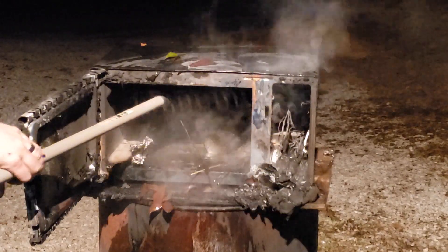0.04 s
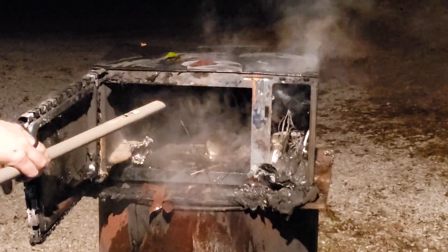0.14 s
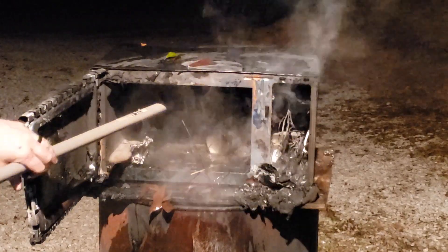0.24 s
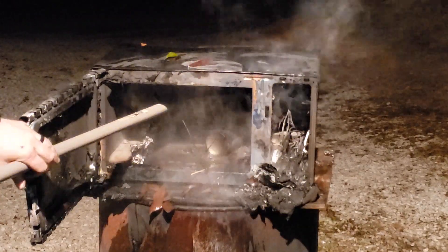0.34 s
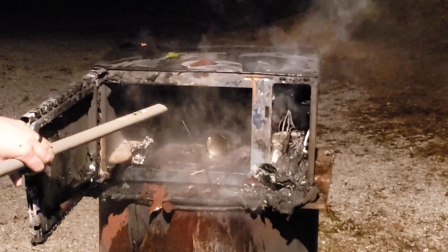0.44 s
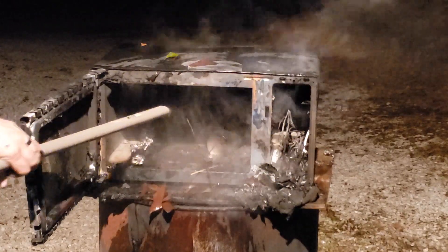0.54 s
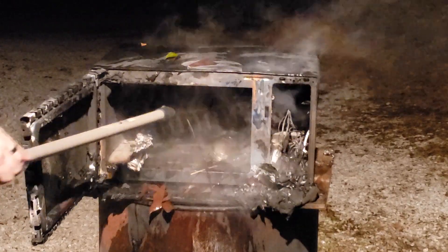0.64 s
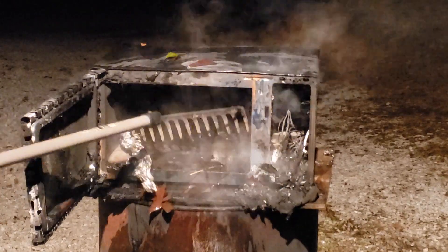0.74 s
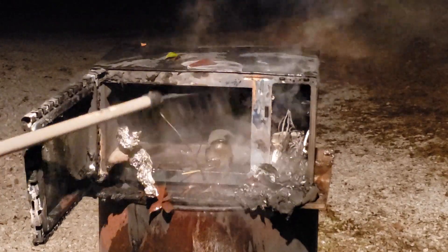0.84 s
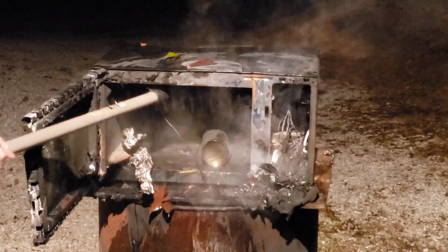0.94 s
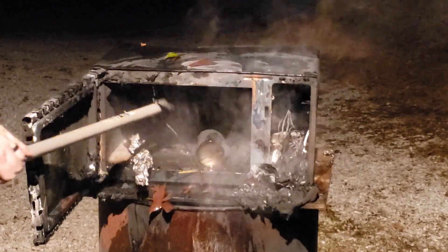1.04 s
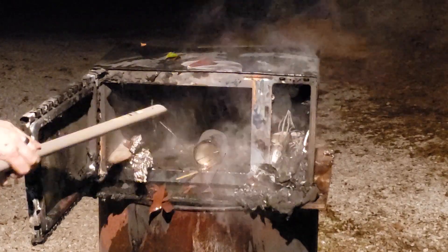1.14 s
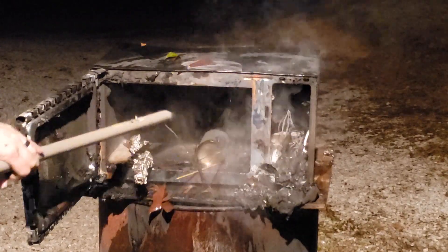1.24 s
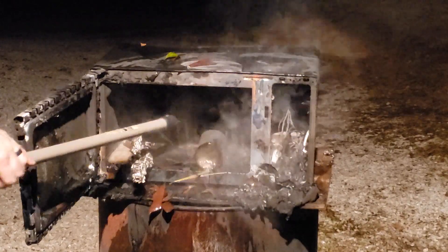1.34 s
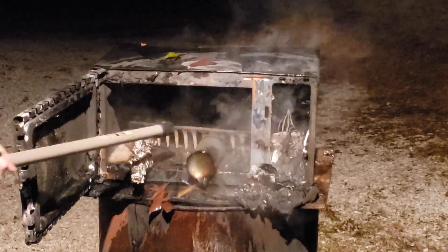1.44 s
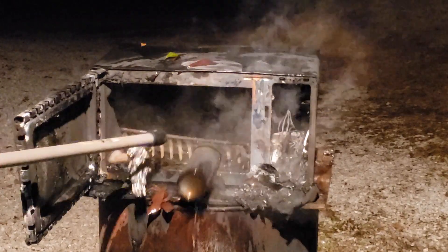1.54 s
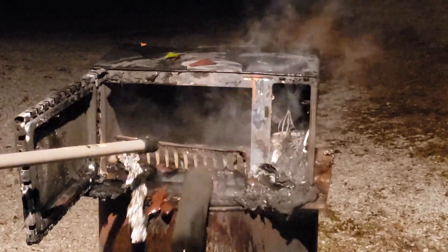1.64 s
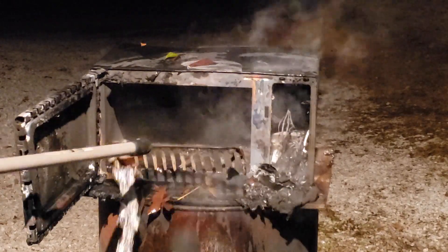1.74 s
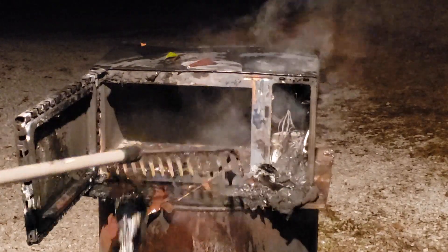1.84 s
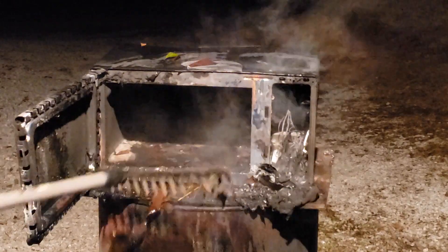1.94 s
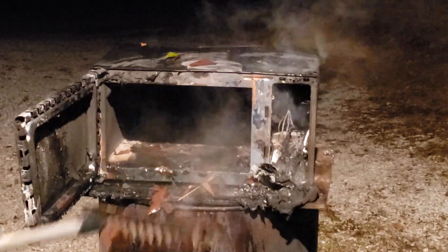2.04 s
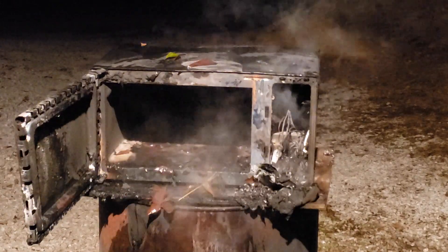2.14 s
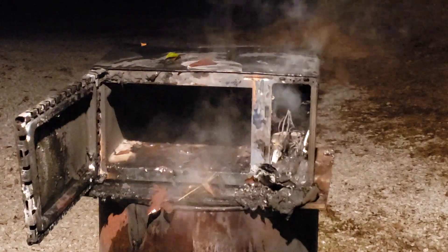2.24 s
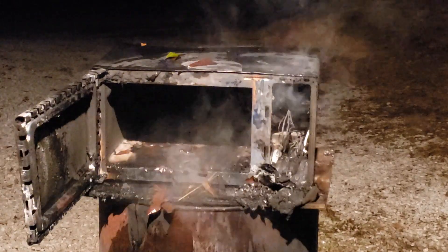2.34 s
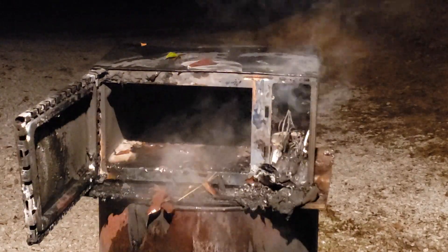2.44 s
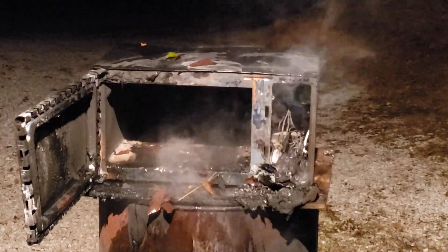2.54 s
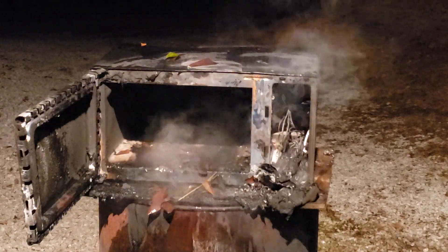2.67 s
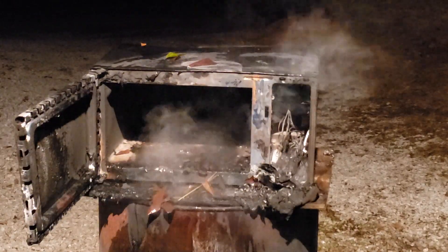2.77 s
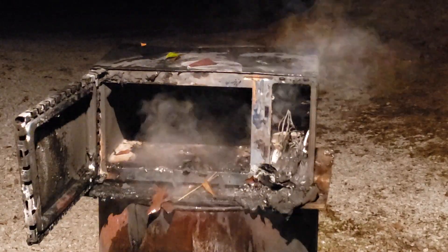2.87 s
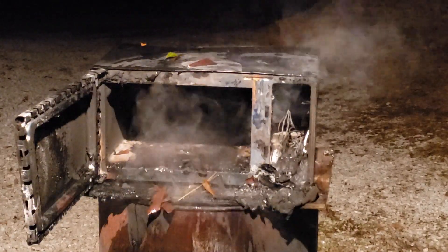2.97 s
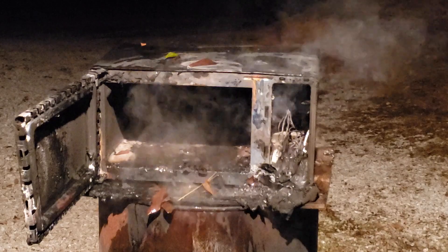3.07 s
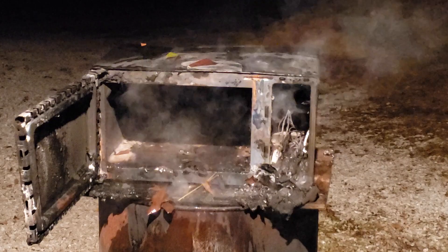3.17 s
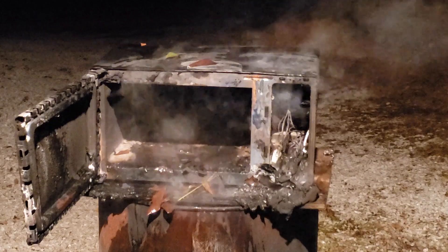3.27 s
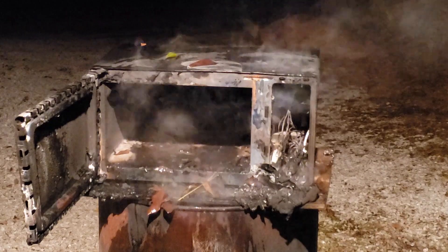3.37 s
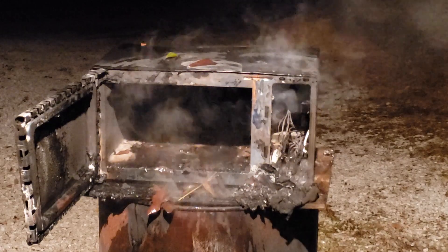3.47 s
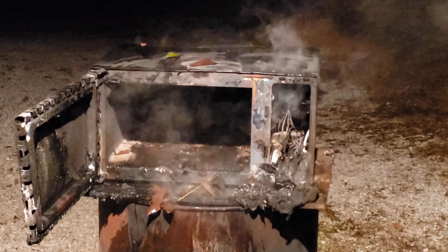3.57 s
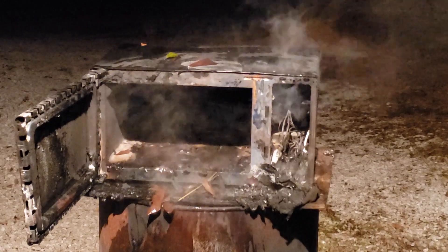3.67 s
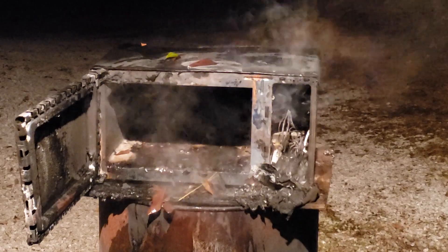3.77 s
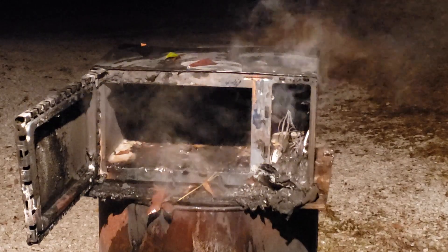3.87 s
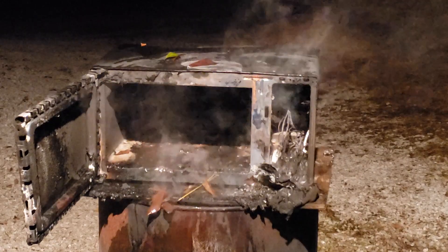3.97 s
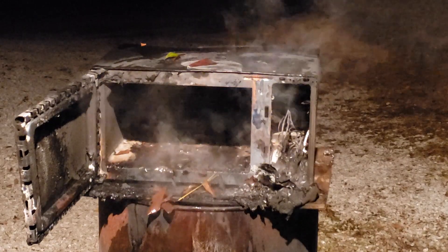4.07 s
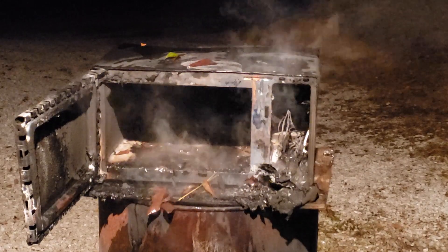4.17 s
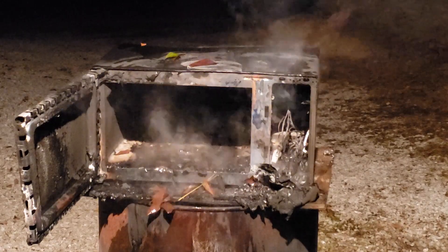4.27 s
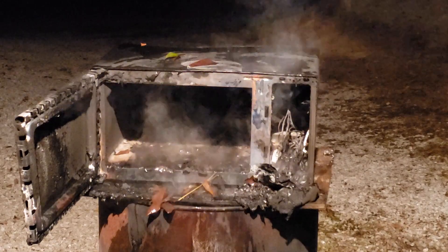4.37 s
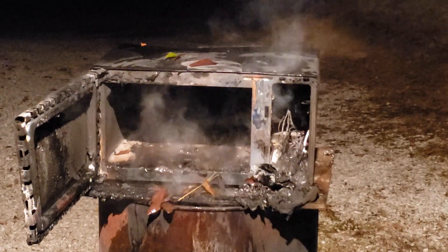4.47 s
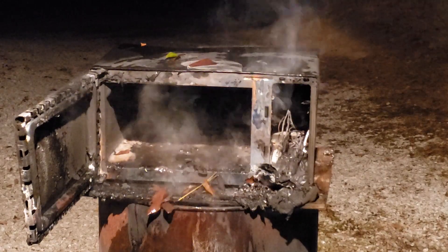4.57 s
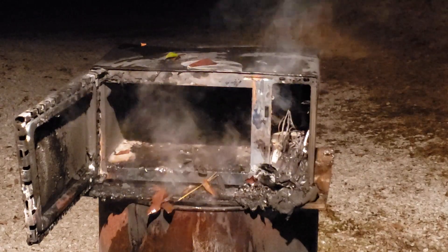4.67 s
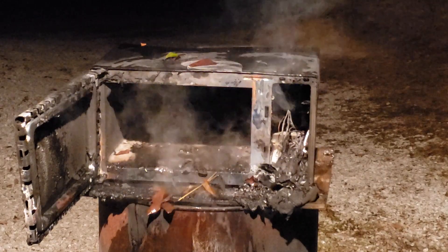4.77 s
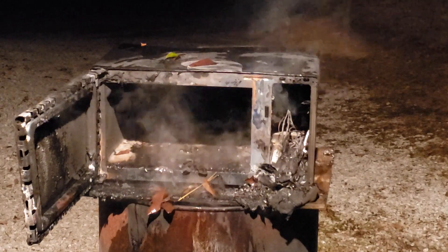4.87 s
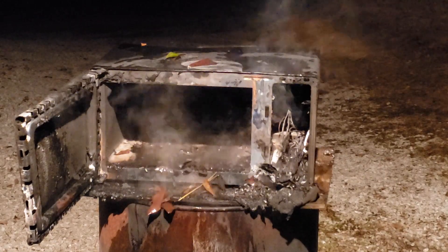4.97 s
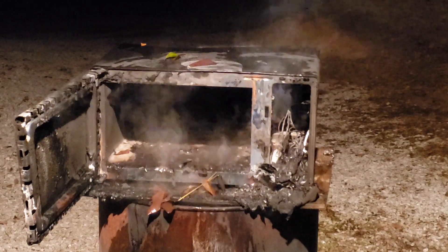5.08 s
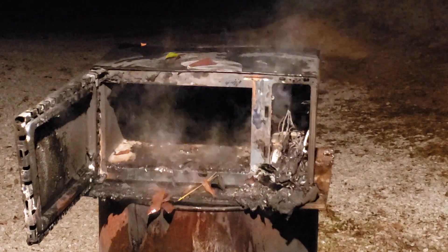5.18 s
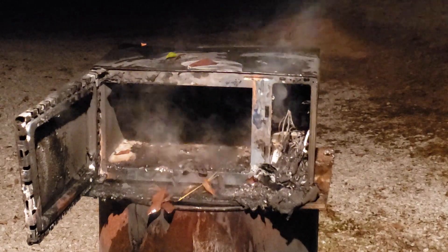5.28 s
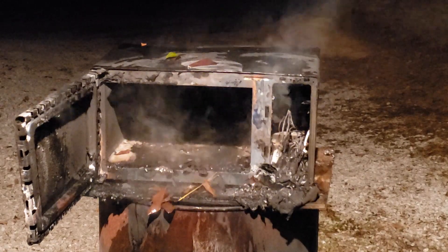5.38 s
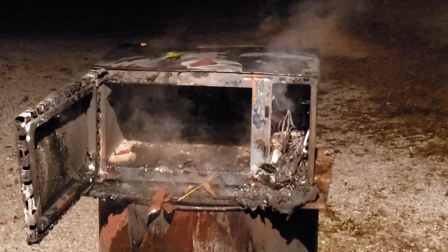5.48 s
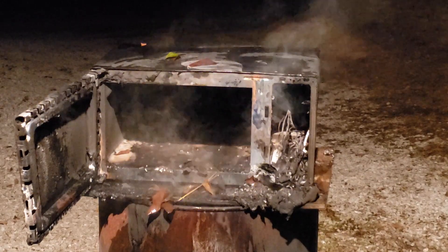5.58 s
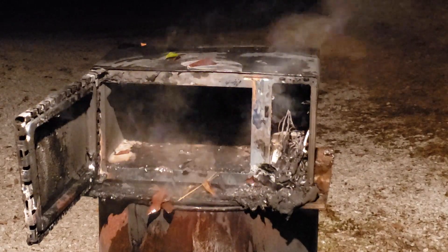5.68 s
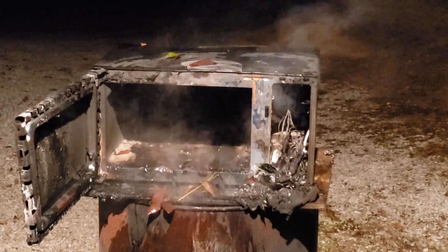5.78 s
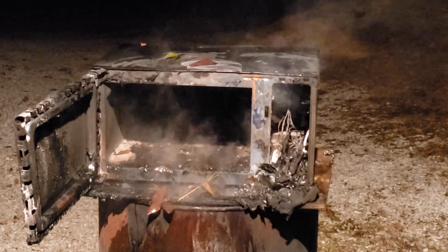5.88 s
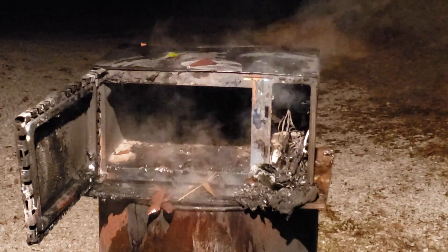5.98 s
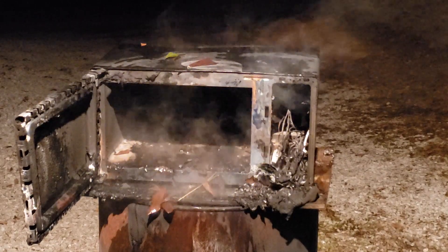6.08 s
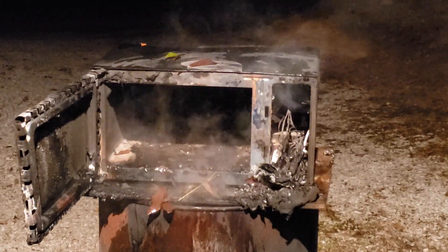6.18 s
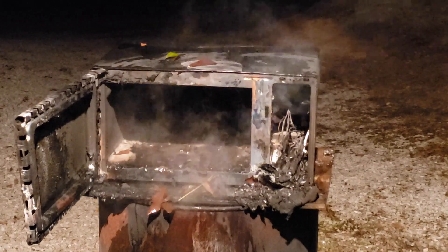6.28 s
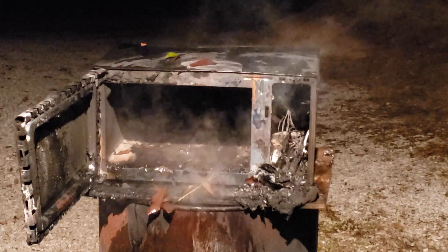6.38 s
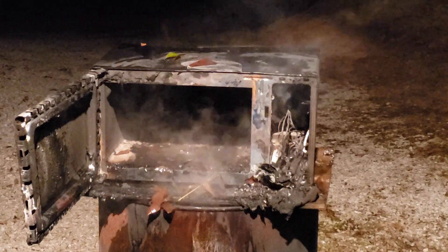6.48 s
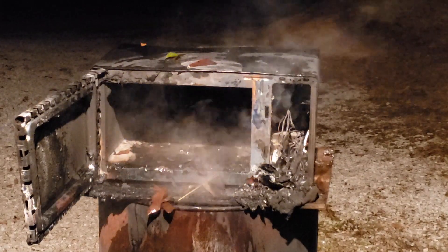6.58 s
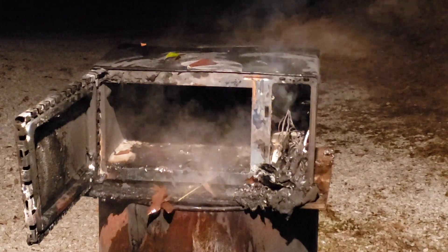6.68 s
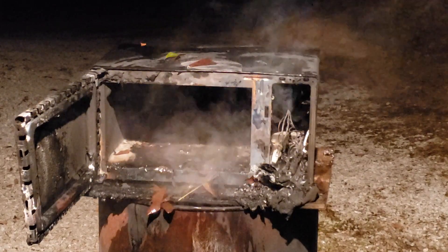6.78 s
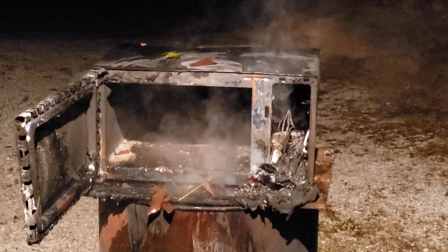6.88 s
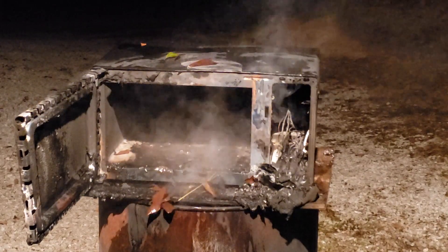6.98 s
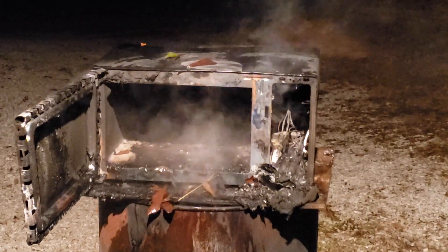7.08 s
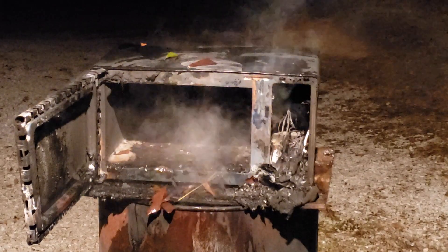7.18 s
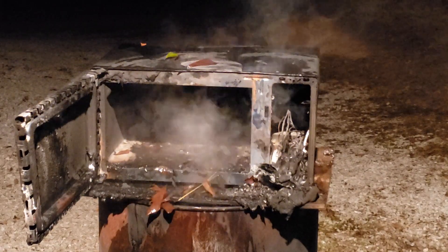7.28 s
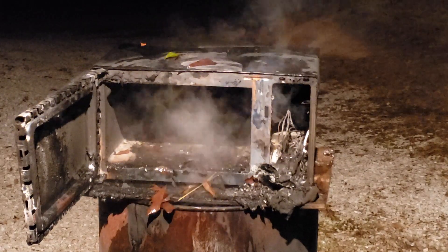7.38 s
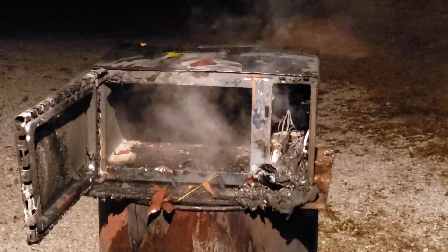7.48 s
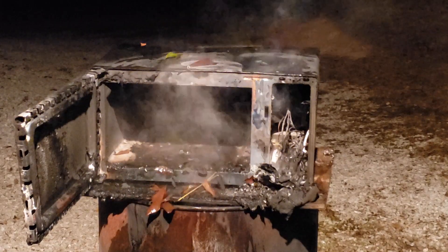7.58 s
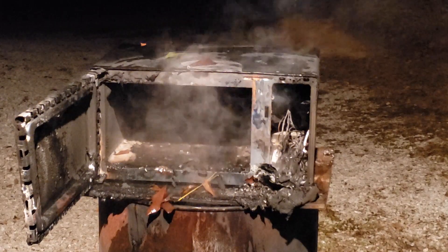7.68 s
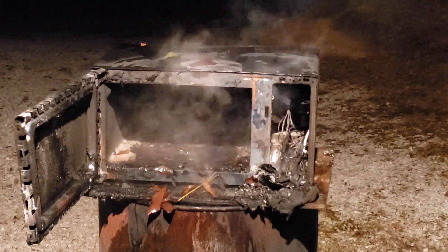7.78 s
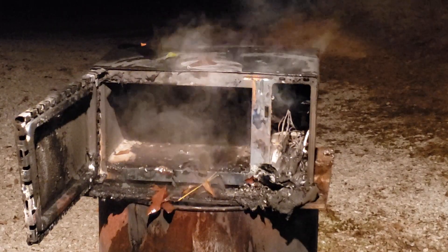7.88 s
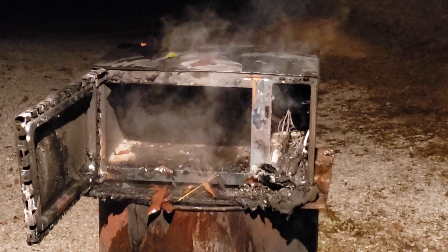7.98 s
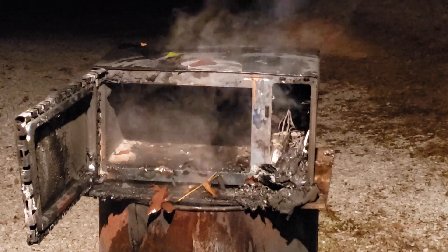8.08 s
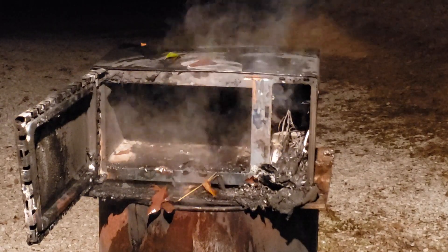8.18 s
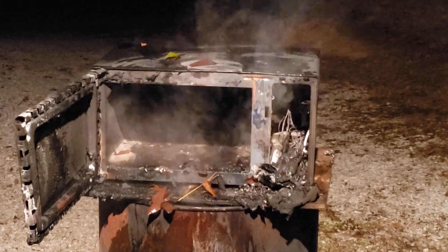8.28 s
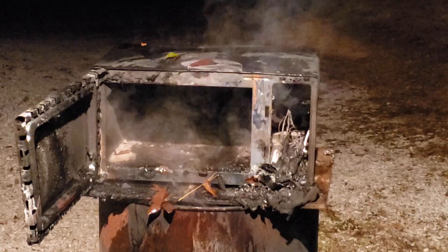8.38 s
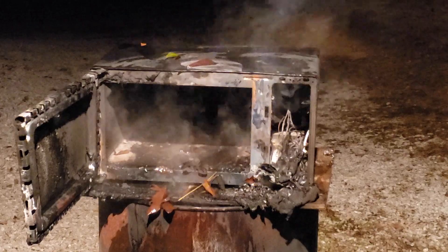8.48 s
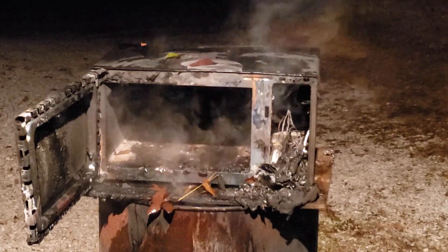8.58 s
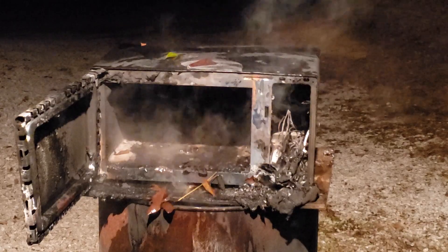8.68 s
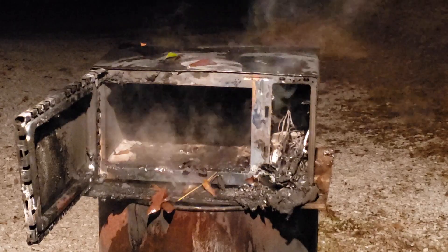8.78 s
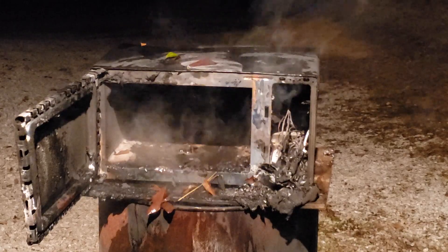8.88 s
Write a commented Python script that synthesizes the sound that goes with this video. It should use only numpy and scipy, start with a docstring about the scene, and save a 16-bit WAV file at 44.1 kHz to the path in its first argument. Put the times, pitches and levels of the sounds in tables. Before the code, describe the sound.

Close up outdoors at night, a steel rake knocks and drags in a thin-walled metal oven shell, booming and rasping while steam hisses. At about two seconds a tin can drops with a sharp clank. Afterwards it is nudged in separate bouts of light clinks, with gravel crunches and a brief ringing of steel tines. A low distant rumble with a blurred engine drone recedes underneath. Close stereo microphone, very little reverberation.

```python
"""A steel rake scrapes and knocks about in a hot, burnt-out oven shell and drags out a tin can, outdoors at night.
Each blow is a noisy crack plus the ringing of the object's main modes; dragging adds a boom and a rasp.
The can drops to the gravel and is nudged along in bouts of clinks; the tines ring and the stones crunch.
Steam, made of filtered noise and fine clicks, hisses from the wet metal over a low, far rumble of filtered
noise with a blurred engine note and a thin, steady top hiss."""
import sys
import numpy as np
from scipy import signal
from scipy.fft import rfft, irfft, next_fast_len
from scipy.io import wavfile

SR = 44100
rng = np.random.default_rng(int(sys.argv[2]) if len(sys.argv) > 2 else 0)


def unload_audio(sound):
    """Save the sound as a 16-bit wav file, at the path given as the first command line argument."""
    columns = np.transpose(np.atleast_2d(sound))
    # keep every value between -1 and 1, then stretch to whole-number steps
    steps = np.round(np.clip(columns, -1, 1) * 32767)
    wavfile.write(sys.argv[1], SR, steps.astype(np.int16))


N = 393372
T = np.arange(N) / SR

# In the tables of blows, thud (400 to 650 Hz) and brightness (treble) are relative to the level near 1.8 kHz.
# The rake hits the oven shell. Each row: start in seconds, contact length in seconds,
# level near 1.8 kHz in dB, thud in dB, brightness in dB.
KNOCKS = [(.2, 0.027, -20.5, -7, -8.5), (0.219, 0.0012, -10.5, 7, -27), (.228, 0.022, -19, 12, -13.5),
          (.518, 0.0044, -24, -12, -13.5), (.602, 0.0055, -25, -5.5, -38), (.713, 0.0084, -18.5, 9, -0.5),
          (.885, 0.028, -9.5, 2.5, -18), (0.902, .01, -11, 15.5, -20.5), (.99, 0.016, -24.5, 12.5, -7),
          (1.062, 0.0055, -14, 9.5, -13.5), (1.148, 0.0077, -13, -4, -15), (1.248, 0.011, -12, -0.5, -20),
          (1.294, 0.027, -8.5, 10, -22), (1.335, 0.032, -22, 16.5, -15), (1.459, 0.02, -18, 2.5, -7.5),
          (1.565, 0.036, -24.5, 13, -11), (1.777, 0.036, -39, 7, -0.5), (1.863, .003, -52, 2, 13.5)]
# The can lands, tips and tumbles. Each row: start in seconds, contact length in seconds,
# tick level near 3.2 kHz in dB, ring in dB before it takes on the tick's colour.
CLINKS = [(1.9985, 0.0024, -4, -28.5), (2.008, .02, -15.5, -34.5), (2.132, .027, -28, -48),
          (2.184, 0.0028, -21, -59), (2.312, 0.0042, -41, -64.5), (3.78, 0.013, -44, -58),
          (4.125, 0.03, -35, -37.5), (4.243, 0.0034, -28, -41.5), (4.304, 0.0098, -30, -55),
          (4.334, 0.0015, -28, -49), (4.402, 0.0027, -27.5, -42.5), (4.468, 0.0042, -40.5, -55),
          (4.533, 0.012, -52.5, -39.5), (6.212, 0.0069, -33, -34.5), (6.227, 0.017, -23, -36),
          (6.285, 0.03, -18.5, -32), (6.462, 0.018, -30, -43), (6.486, 0.023, -20.5, -32),
          (6.555, 0.032, -26.5, -42.5), (6.645, 0.0089, -24, -38.5), (6.688, 0.037, -23.5, -34),
          (6.79, 0.012, -50, -55), (6.846, 0.016, -34, -49), (6.899, 0.0041, -43, -55),
          (7.016, 0.015, -38.5, -43.5), (7.19, 0.043, -43, -47), (7.445, 0.022, -22, -27),
          (7.5, 0.0032, -18.5, -43), (7.55, 0.017, -22, -35), (7.61, .008, -19.5, -53),
          (7.656, 0.0063, -15.5, -37), (7.758, 0.0034, -27.5, -53), (7.794, 0.0022, -28.5, -46.5),
          (7.811, 0.0021, -43, -47), (7.878, 0.0055, -36.5, -48.5), (7.989, 0.017, -40.5, -69),
          (8.065, 0.04, -41, -51), (8.128, .022, -38, -51), (8.278, 0.0038, -43.5, -55)]
# The tines strike stone. Each row: start in seconds, contact length in seconds,
# level near 1.8 kHz in dB, thud in dB, brightness in dB, ring in dB.
TINE_HITS = [(5.406, 0.0059, -22, -5, -11, -58), (5.416, 0.0068, -27.5, -27, -2.5, -42.5),
             (5.582, 0.0029, -25.5, -26, 3, -38.5), (5.607, 0.003, -33, -6, 12, -58),
             (5.633, 0.025, -28, -20, 0, -43.5)]
# Gravel gives way. Each row: start in seconds, contact length in seconds, level near 1.8 kHz in dB,
# thud in dB, brightness in dB, how much sooner the left port hears it in seconds.
CRUNCHES = [(3.055, 0.029, -57, -6, 11, .00023), (3.316, 0.0094, -31, -10, 0, .00023),
            (3.327, 0.02, -22, -6, 0.5, 0.006), (3.355, 0.045, -15.5, -4, -3.5, 0),
            (3.425, 0.045, -25.5, -3, -4, 0.0026), (3.579, 0.0082, -32.5, -21, -3.5, 0.0023),
            (3.7, .001, -47, -6, -24, .00023), (4.599, 0.0011, -21.5, 9, -27.5, 0.0023),
            (6.308, 0.032, -13, -0.5, -7, 0), (6.39, 0.028, -12, -10.5, -9, 0),
            (7.461, 0.017, -19.5, 3.5, -4, 0.0036), (7.478, 0.011, -22.5, -2, 1, 0.0021),
            (7.526, 0.004, -21, 4, -21, 0.0039), (7.687, .0025, -29.5, 1, -33, 0),
            (8.464, 0.011, -13, -12, -2.5, 0.0025), (8.484, 0.051, -16, -10, 0, 0.0065),
            (8.552, .008, -21.5, -6.5, 1, 0.0012), (8.68, 0.094, -39.5, 4, 3, 0.0065)]
# How the oven panels, the can and the tines ring. Each row: pitch in Hz, usual share of the ring in dB,
# time to fade by 60 dB in seconds.
SHELL_MODES = [(59.3, -6, 0.54), (82, -8, 0.59), (106, -18.5, 0.54), (211, -7, 0.12), (209.6, -11, 0.32),
               (232.2, 2, 0.63), (260, -5.5, 0.29), (295, -14.5, 0.56), (488, -23, .14), (584, -14, 0.25),
               (590, -23.5, 0.077), (764, -11.5, 0.036), (967, -18.5, 0.18), (1073, -15.5, 0.071),
               (1360, -18.5, 0.052), (1840, -39, 0.12)]
CAN_MODES = [(819, -7.5, 0.4), (852, -8, 0.8), (887, -11.5, 1), (1130, -15.5, 0.32), (1362, -5.5, 0.2),
             (1340, -5.5, 0.38), (1380.6, -0.5, 0.085), (2660, -8, 0.12), (3010, -16, 0.25),
             (3030, -15.5, 0.11), (4160, -11, 0.09), (4050, -16, .1), (5320, -20, 0.17), (5397, -10, 0.09),
             (5900, -32.5, .1), (7354, -11, 0.062)]
TINE_MODES = [(1454, -2, 0.052), (1660, -9, 0.57), (1986, -5, 0.25), (2010, 2.5, 0.25), (2280, -6, 1.3),
              (2440, -27, 3.4), (2420, -15, 1), (2900, -11, 0.43), (3460, -7, 0.2), (5480, -2, 0.2),
              (7420, -28, 0.28)]
# The tines drag over the oven floor. Each row: time in seconds, force in dB.
DRAG_FORCE = [(0, -22), (.17, -67), (.23, -26), (.43, -53), (.5, -27), (.76, -33.5), (1.36, -28),
              (1.6, -37), (1.77, -59.5)]
# The steam swells and sinks. Each row: time in seconds, hiss in dB before the lift and flicker in steam().
STEAM_LEVEL = [(0, -43.5), (.18, -59), (.22, -43), (.45, -49.5), (.78, -42.5), (.97, -39), (1.2, -43.5),
               (1.62, -39.5), (1.8, -58), (2.2, -59), (2.6, -68.5), (2.85, -57.5), (3.55, -62), (4, -68.5),
               (5.25, -67), (6.1, -70.5), (7.9, -60), (8.92, -60.5)]
# The far rumble recedes. Each row: time in seconds, rumble in dB before the lift and wavering in night().
RUMBLE_LEVEL = [(1.8, -47), (5.3, -48), (6, -50.5), (8.92, -55)]
# A far engine drones. Each row: time in seconds, pitch in Hz, level in dB.
DRONE = [(0, 360, -55.5), (1.8, 361, -53.5), (2.2, 350, -60), (2.8, 341.5, -54), (3.4, 335, -54),
         (4, 321.6, -66), (6, 318, -77.5), (8.92, 318.4, -72.5)]
# The colour of each noise. Each row: frequency in Hz, relative strength per Hz in dB.
RASP_COLOUR = [(150, -16.5), (300, 10.5), (700, 16.5), (1200, -13), (2500, -11.5), (5000, -7.5),
               (16000, -42)]
STEAM_COLOUR = [(800, -7.5), (2000, -2.5), (3500, -5), (7000, -4), (11000, -6), (16000, 2.5)]
RUMBLE_COLOUR = [(15, -45), (25, 9), (74, 7), (168, -3), (235, -7), (334, -12.5), (408, -9.5), (711, -10.5),
                 (812, -10.5), (1180, -19.5), (1930, -27), (2200, -31), (2630, -34.5), (5000, -60),
                 (6500, -69.5), (11000, -120)]
TOP_HISS_COLOUR = [(7000, -23.5), (11000, -6.5), (13500, -7), (16000, -0.5)]
# The microphone. Each row: frequency in Hz, response in dB, left minus right in dB,
# gain in dB of the part that differs between the sides.
MICROPHONE = [(20, -42, 3, -26.5), (45, -11.5, 3.5, -21.5), (218, -2.5, 3, -10), (400, -5.5, 6.5, -18.5),
              (637, -3, 4, -3.5), (1390, -0.5, 6, -3), (2315, -2, 5.5, -3), (4000, -1.5, 0.5, -2.5),
              (7940, -3.5, -2.5, -1.5), (8620, -11, -2.5, 0.5), (11720, -5.5, 0, -2.5),
              (15970, -1, 7.5, 1.5)]
# The can rocks on between clinks. Each row: start in seconds, length in seconds, first tick in dB.
CAN_ROLLS = [(2.04, 0.34, -36), (4.14, .5, -35), (6.25, 0.73, -29.5), (7.5, .44, -31)]
# Loosened stones trickle back. Each row: start in seconds, length in seconds, first level in dB.
TRICKLES = [(3.45, 0.29, -37.5), (8.58, .22, -42.5)]
# The tines catch and skip over the floor. Each row: start in seconds, length in seconds, first level in dB.
SKIPS = [(.27, 0.064, -41.5), (.53, 0.22, -30), (1.08, 0.068, -27), (1.49, 0.21, -26.5)]

SETTLE_DB = 10  # fall in level as things come to rest
OUTDOOR_T60_S, OUTDOOR_DB = 0.35, -11.5
TOP_HZ, TOP_HISS_DB = 15900, -60  # the microphone's top edge; the level of the steady hiss
BOOM_BEND_S = .0016  # typical time the boom runs early or late as its pitch bends
# the panels ring in step with the knock, and more after a heavy thud (dB of ring per dB of thud)
SHELL_RING_DB, SHELL_RING_PER_THUD = -13.5, 0.53
SKIP_CONTACT_S, SKIP_THUD_DB, SKIP_BRIGHT_DB = .006, -4.5, -9
ROLL_CONTACT_S, ROLL_RING_DB = 0.009, -18.5  # the ring is relative to the tick
# a harder tick is brighter: brightness at the usual tick, and its rise per dB
USUAL_TICK_DB, CAN_BRIGHT_DB, BRIGHT_PER_DB = -30.5, 4, 0.3529
CAN_TINT = .4  # share of a tick's colour that the ring takes on
# a short contact thuds, a long one hardly does
CAN_THUD_DB, THUD_FALL_DB_PER_S = 2, 702.5
GRAVEL_SIDE_DB = -5.5  # gain of the part of the crunch that differs between the ports
TRICKLE_CONTACT_S, TRICKLE_THUD_DB, TRICKLE_BRIGHT_DB, TRICKLE_LEAD_S = 0.029, -25, 0.5, .00023


def undb(db):
    """Turn dB into a plain gain."""
    return 10 ** (np.asarray(db) / 20)


def curve(rows, column=1):
    """One column of a table, joined by straight lines in time."""
    rows = np.array(rows)
    return np.interp(T, rows[:, 0], rows[:, column])


def colour(x, points):
    """Filter by (Hz, dB) points without sounding ahead of time, so attacks stay sharp."""
    size = 2 * next_fast_len(x.shape[-1] // 2 + 1024)
    hz, db = np.transpose(points)
    bins_hz = np.arange(size // 2 + 1) * SR / size
    log_gain = np.log(undb(np.interp(np.log(bins_hz + 1), np.log(hz), db)))
    # folding the cepstrum forward gives the filter minimum phase
    cepstrum = irfft(log_gain)
    cepstrum[1:size // 2] *= 2
    cepstrum[size // 2 + 1:] = 0
    response = np.exp(rfft(cepstrum))
    return irfft(rfft(x, size) * response)[..., :x.shape[-1]]


def level(x):
    """Scale to an rms of 1."""
    return x / np.sqrt(np.mean(x ** 2))


def blow(x):
    """Scale to the energy of 10 ms at an rms of 1."""
    return level(x) * np.sqrt(SR / 100 / x.shape[-1])


def fade(t, t60):
    """Die away by 60 dB in t60 seconds."""
    return np.exp(-np.log(1000) * t / t60)


def walk(rate):
    """Wander slowly between random values, `rate` of them a second, with a spread near 1."""
    knots = rng.standard_normal(1024)
    return np.interp(T * rate, np.arange(len(knots)), knots)


def grains(shape, rate, spread_db):
    """Random clicks, about `rate` a second: many small and a few large."""
    sizes = undb(spread_db * np.minimum(rng.exponential(size=shape), 4))
    happens = rng.random(shape) < rate / SR
    return happens * sizes * rng.choice([-1, 1], shape)


def add(out, s, x):
    """Mix x into out at time s."""
    start = max(int(s * SR), 0)
    out[:, start:start + x.shape[-1]] += x[:, :max(N - start, 0)]


def ring(push, modes, scatter_db=4.03, phase_spread=0.7, detune=0):
    """A force drives the modes; each blow favours others, shifts them a little and leaves at its own angle."""
    out = 0
    for hz, db, t60 in modes:
        pitch = hz * (1 + detune * rng.standard_normal())
        pole = np.exp(2j * np.pi * pitch / SR) * fade(1 / SR, t60)
        swing = signal.lfilter([1], [1, -pole], push)
        turn = np.exp(1j * phase_spread * rng.standard_normal() * np.array([[1], [-1]]))
        # short waves depend more on where the blow lands
        chance_db = scatter_db * np.sqrt(hz / 1000) * np.clip(rng.standard_normal(), -2, 1.5)
        out = out + undb(db + chance_db) * level((swing * turn).imag)
    return out


def contact(t, length, rate, spread_db, first_db):
    """A first touch, then a chatter of small slips that dies away."""
    chatter = grains(len(t), rate, spread_db) * np.exp(-(t / length) ** 2)
    chatter[0] += undb(first_db)
    return chatter


def clatter(push, clatter_t60, tail_t60, tail_db):
    """A burst of noise answers each slip: a quick crack and a short wash, new for every blow."""
    t = T[:SR // 4]
    envelope = fade(t, clatter_t60) + undb(tail_db) * fade(t, tail_t60)
    burst = rng.standard_normal((2, len(t))) * envelope
    return blow(signal.fftconvolve(push[None], burst, axes=1)[:, :len(push)])


def strikes(table, modes, rate, spread_db, first_db, clatter_t60, tail_t60, tail_db,
            body_hz, edge_hz, top_db, bass_db, size, tint=0, detune=0):
    """Every contact in a table gives a crack and, if modes are given, sets them ringing."""
    out, t = np.zeros((2, N)), T[:size]
    for s, length, db, thud_db, bright_db, *ring_db in table:
        push = contact(t, max(length, 1 / SR), rate, spread_db, first_db)
        # thud sets what lies below the body, brightness what lies above the edge
        bass = [(150, thud_db + bass_db), (400, thud_db), (650, thud_db), (body_hz, 0)]
        tone = bass + [(edge_hz, 0), (2 * edge_hz, bright_db), (13000, bright_db + top_db)]
        crack = colour(clatter(push, clatter_t60, tail_t60, tail_db), tone)
        add(out, s, undb(db) * crack)
        if modes:
            # the ring takes on a share (tint) of the blow's colour
            tinted = [(hz, share_db + tint * np.interp(hz, *np.transpose(tone)), t60)
                      for hz, share_db, t60 in modes]
            energy_scale = np.sqrt(SR / 100 / size)
            add(out, s, undb(ring_db[0]) * energy_scale * ring(push, tinted, detune=detune))
    return out


def settling(bouts, count):
    """Small contacts at uneven gaps, tending weaker as the motion dies: (seconds, dB) each."""
    contacts = []
    for start, length, db in bouts:
        when, strength = rng.random((count, 2)).T
        progress = (np.arange(count) + when) / count
        levels_db = db - SETTLE_DB * progress + 7 * (strength - .5)
        contacts += zip(start + length * progress, levels_db)
    return contacts


def place(x, lead_s):
    """Both ports hear much the same sound, the left one sooner by lead_s."""
    mid = (x[0] + x[1]) / 2
    side = undb(GRAVEL_SIDE_DB) * (x[0] - x[1]) / 2
    return np.array([mid + side, np.roll(mid - side, round(lead_s * SR))])


def outdoors(x):
    """Ground and surroundings scatter back a faint tail of fading noise."""
    t = T[:SR]
    echo = rng.standard_normal((2, SR)) * fade(t, OUTDOOR_T60_S) * (1 - fade(t, 0.011))
    echo = colour(level(echo) / np.sqrt(SR), [(200, 6), (1500, 3), (5000, -1.0), (15000, -3.5)])
    return x + undb(OUTDOOR_DB) * signal.fftconvolve(x, echo, axes=1)[:, :N]


def top_hiss():
    """A thin, steady hiss at the very top: filtered noise."""
    return level(colour(rng.standard_normal((2, N)), TOP_HISS_COLOUR)) * undb(TOP_HISS_DB)


def night():
    """A far rumble of noise wavers, with an engine note blurred by random changes in strength and phase."""
    rumble = level(colour(rng.standard_normal((2, N)), RUMBLE_COLOUR))
    rumble = rumble * undb(curve(RUMBLE_LEVEL) + 6.0 + 1.7 * walk(10))
    tone = np.exp(2j * np.pi * np.cumsum(curve(DRONE)) / SR)
    note = tone * (walk(60) + 1j * walk(60))
    return rumble + level(note.real) * undb(curve(DRONE, column=2))


def steam():
    """Water boils off the hot metal: smooth hiss with a fine sizzle of clicks."""
    sizzle = level(grains((2, N), 1500, 3.5))
    hiss = rng.standard_normal((2, N)) + undb(-1) * sizzle
    flicker_db = 0.65 * walk(12)
    return level(colour(hiss, STEAM_COLOUR)) * undb(curve(STEAM_LEVEL) + 3.5 + flicker_db)


def gravel():
    """Many small stones slide over each other and against the rake's head, which adds a broad resonance."""
    trickle = [(s, TRICKLE_CONTACT_S, db, TRICKLE_THUD_DB, TRICKLE_BRIGHT_DB, TRICKLE_LEAD_S)
               for s, db in settling(TRICKLES, count=6)]
    stones = 0
    for *blow_row, lead_s in list(CRUNCHES) + trickle:
        crunch = strikes([blow_row], [], rate=1100, spread_db=0.5, first_db=-5,
                         clatter_t60=0.011, tail_t60=0.13, tail_db=-16,
                         body_hz=1470, edge_hz=2550, top_db=2.0, bass_db=-11, size=14000)
        stones = stones + place(crunch, lead_s)
    return colour(stones, [(1000, 0.5), (1500, 4.5), (1950, 2.0), (2550, 0), (3300, 1)])


def tines():
    """Solid steel prongs ring on after a sharp tick."""
    return strikes(TINE_HITS, TINE_MODES, rate=910, spread_db=2.5, first_db=-2.5,
                   clatter_t60=0.03, tail_t60=0.33, tail_db=-15,
                   body_hz=1450, edge_hz=6000, top_db=-3.0, bass_db=-6.5, size=44000)


def can():
    """Thin tin ticks against stones and rings briefly; between the clear clinks it rocks to rest."""
    rocking = [(s, ROLL_CONTACT_S, db, db + ROLL_RING_DB) for s, db in settling(CAN_ROLLS, count=10)]
    blows = []
    for s, length, tick_db, ring_db in list(CLINKS) + rocking:
        bright_db = CAN_BRIGHT_DB + BRIGHT_PER_DB * (tick_db - USUAL_TICK_DB)
        thud_db = CAN_THUD_DB - THUD_FALL_DB_PER_S * length
        blows.append((s, length, tick_db - bright_db, thud_db, bright_db, ring_db))
    return strikes(blows, CAN_MODES, rate=1300, spread_db=3.0, first_db=0.0,
                   clatter_t60=.009, tail_t60=0.19, tail_db=-19.0,
                   body_hz=1315, edge_hz=1600, top_db=-4.5, bass_db=9.5,
                   tint=CAN_TINT, detune=0.009, size=20000)


def rake_knocks():
    """The rake knocks and skips on the thin panels, which crack and ring."""
    skips = [(s, SKIP_CONTACT_S, db, SKIP_THUD_DB, SKIP_BRIGHT_DB) for s, db in settling(SKIPS, count=4)]
    blows = []
    for s, length, db, thud_db, bright_db in list(KNOCKS) + skips:
        ring_db = db + SHELL_RING_DB + SHELL_RING_PER_THUD * thud_db
        blows.append((s, length, db, thud_db, bright_db, ring_db))
    return strikes(blows, SHELL_MODES, rate=1000, spread_db=5.0, first_db=9.5,
                   clatter_t60=0.039, tail_t60=0.14, tail_db=-6.0,
                   body_hz=1180, edge_hz=2600, top_db=-1, bass_db=-10.5, detune=.018, size=16000)


def rake_drag():
    """Dragging the rake keeps the panels booming and rasps on the burnt floor."""
    panels = ring(grains(N, 800, 2.5), SHELL_MODES)
    # the rake's uneven pressure bends the panels' pitch and makes the boom come and go
    bent_time = T + BOOM_BEND_S * walk(22)
    boom = np.array([np.interp(bent_time, T, side) for side in panels])
    boom = boom * undb(-8.5 + 3.5 * walk(16))
    rasp = level(colour(grains((2, N), 1800, 1.6), RASP_COLOUR)) * undb(-16.5 + 2 * walk(30))
    stop = np.interp(T, [1.8, 1.95], [1, 0])
    return (boom + rasp) * undb(curve(DRAG_FORCE)) * stop


def scene():
    """The rake, can and gravel with their faint outdoor tail, over steam and the night's background."""
    background = top_hiss() + night() + steam()
    close_sounds = gravel() + tines() + can() + rake_knocks() + rake_drag()
    return background + outdoors(close_sounds)


def record(dry):
    """Two close ports: alike in the bass, each with its own colour, and a steep top edge."""
    hz, response_db, tilt_db, side_db = np.transpose(MICROPHONE)
    # width and balance change with frequency without shifting the phase
    log_hz = np.log(np.arange(N // 2 + 1) * SR / N + 1)
    width = undb(np.interp(log_hz, np.log(hz), side_db))
    tilt = undb(np.interp(log_hz, np.log(hz), tilt_db / 2))
    mid = rfft((dry[0] + dry[1]) / 2)
    side = rfft((dry[0] - dry[1]) / 2) * width
    ports = irfft(np.array([(mid + side) * tilt, (mid - side) / tilt]), N)
    ports = colour(ports, np.c_[hz, response_db])
    top_edge = signal.ellip(10, .2, 70, TOP_HZ, fs=SR, output="sos")
    return signal.sosfilt(top_edge, ports)


dry = scene()
out = record(dry)
unload_audio(out)
```